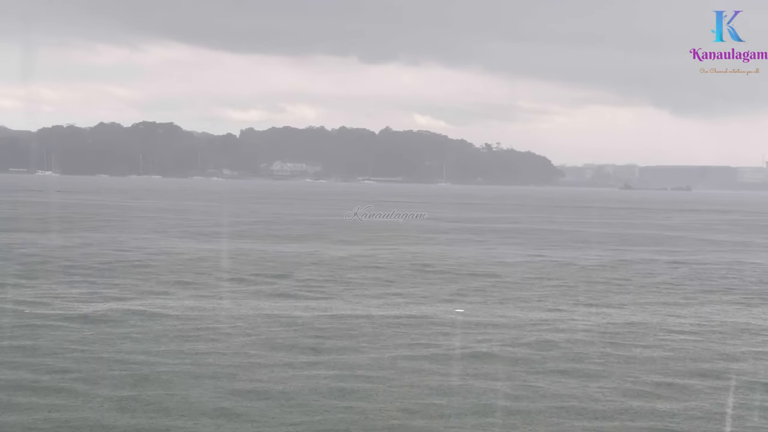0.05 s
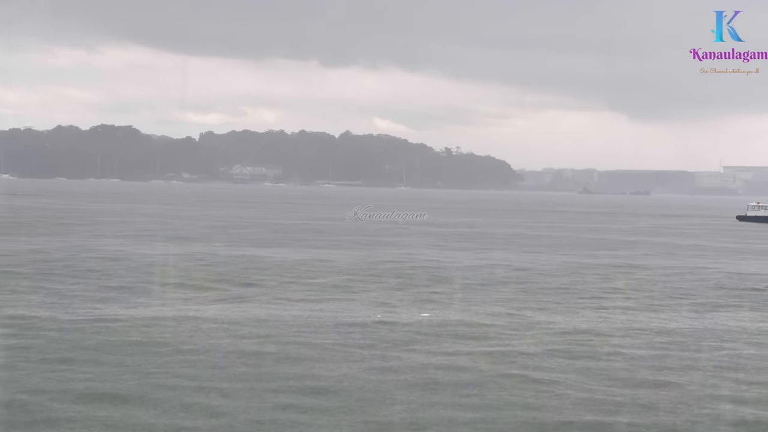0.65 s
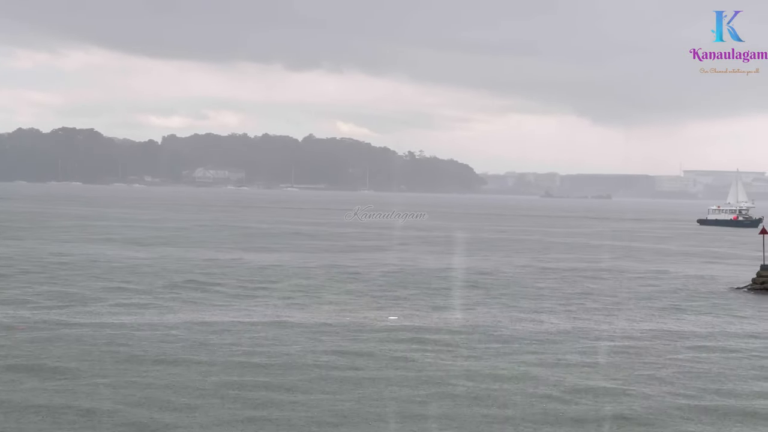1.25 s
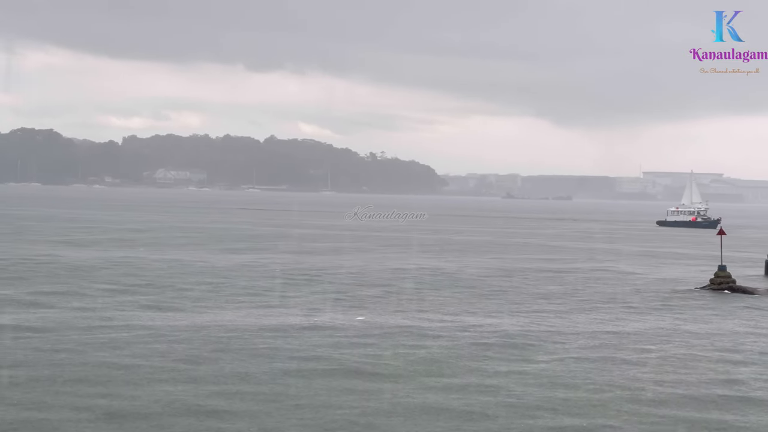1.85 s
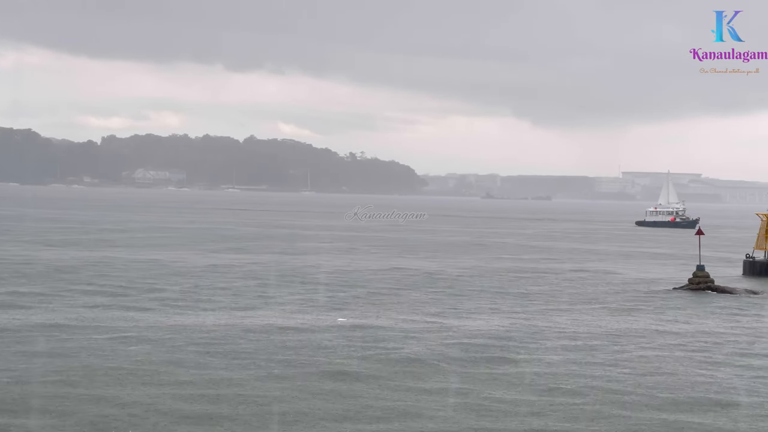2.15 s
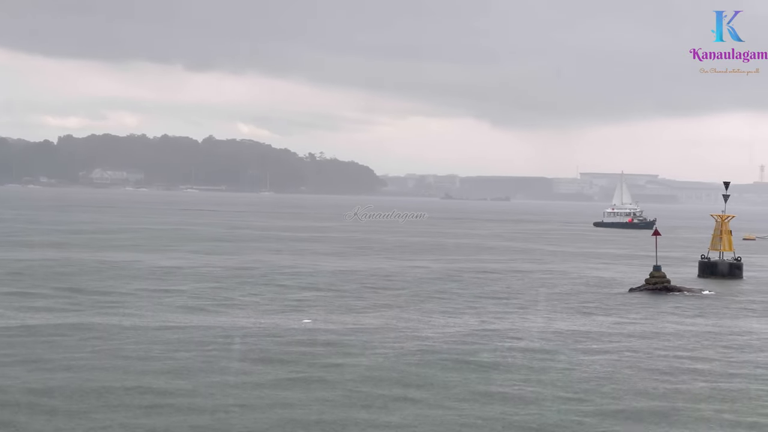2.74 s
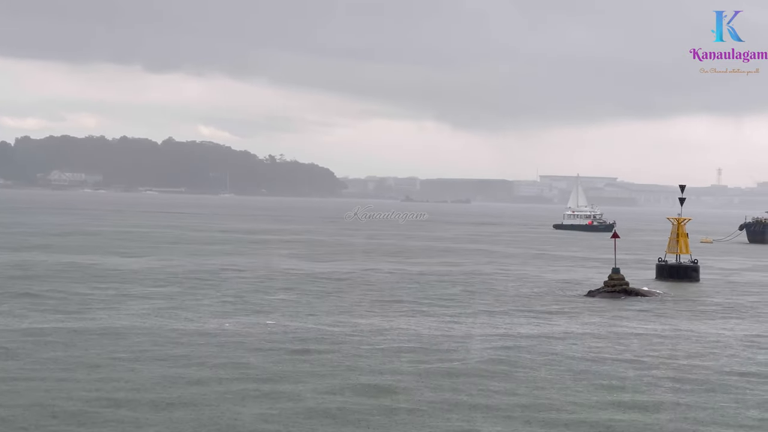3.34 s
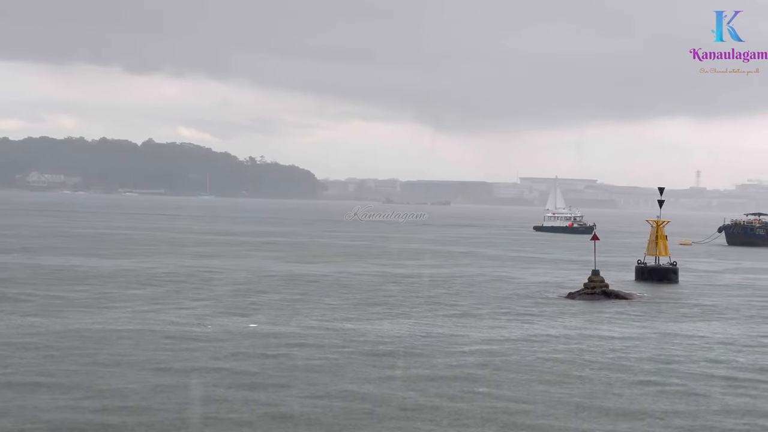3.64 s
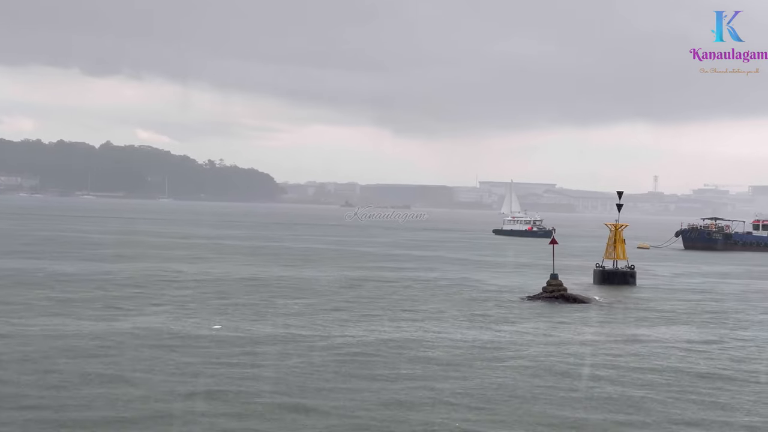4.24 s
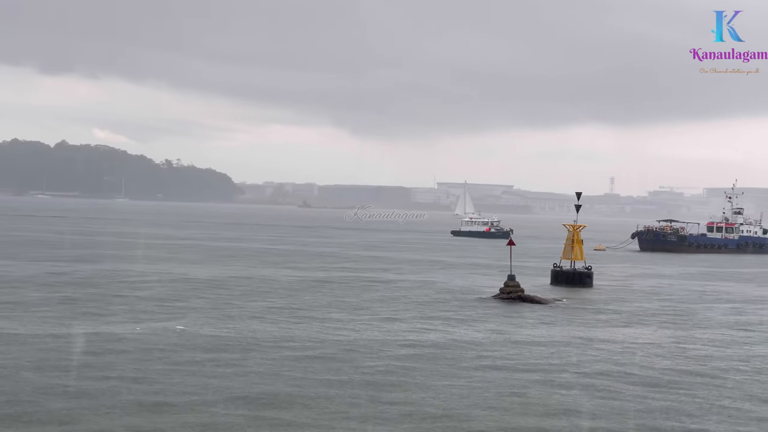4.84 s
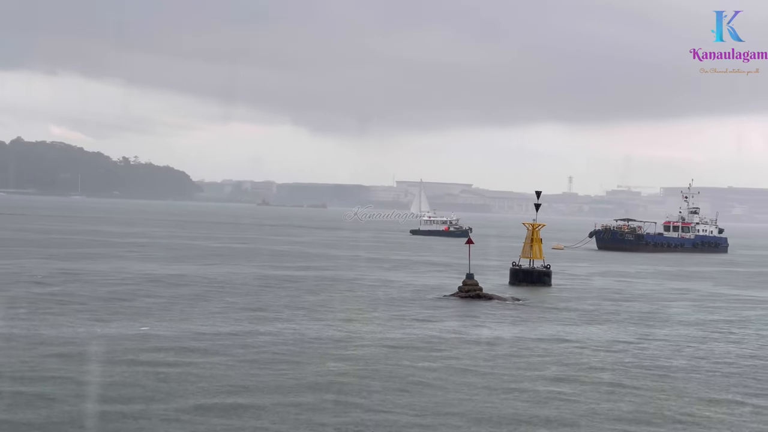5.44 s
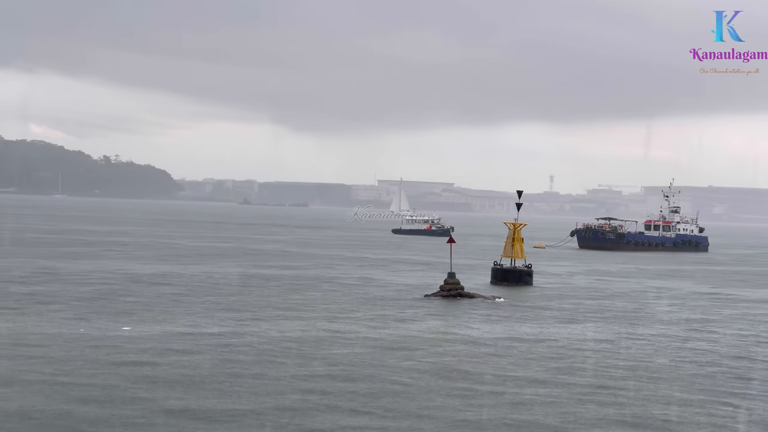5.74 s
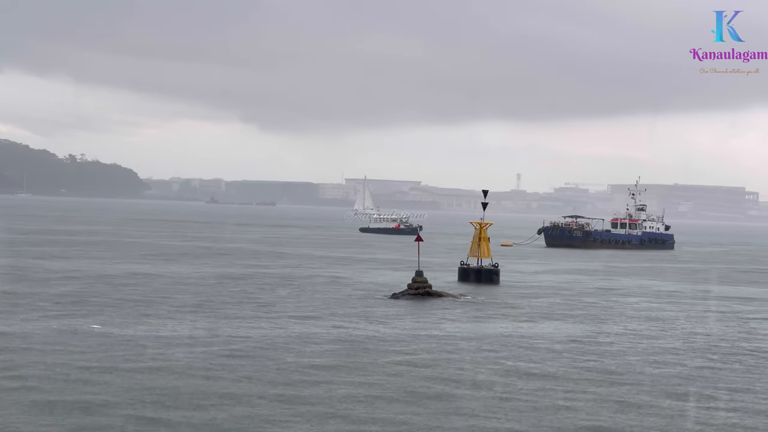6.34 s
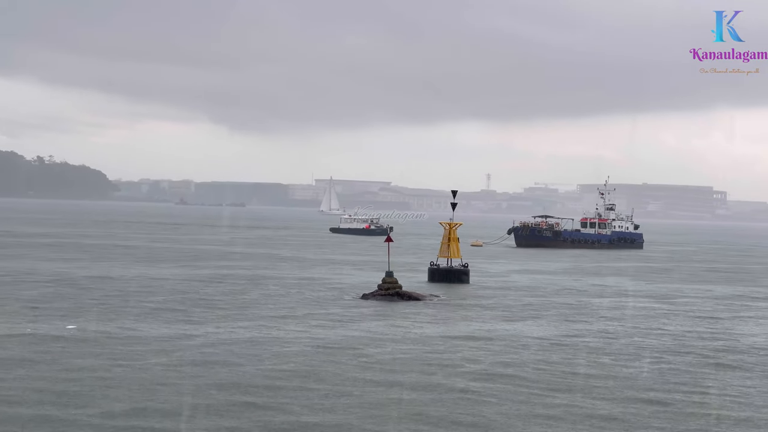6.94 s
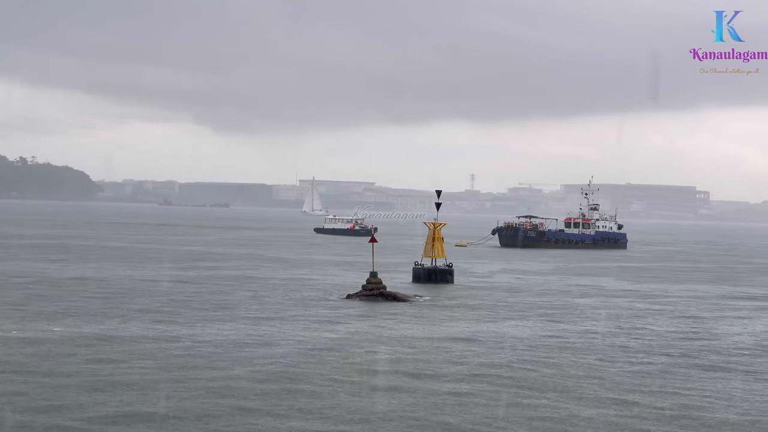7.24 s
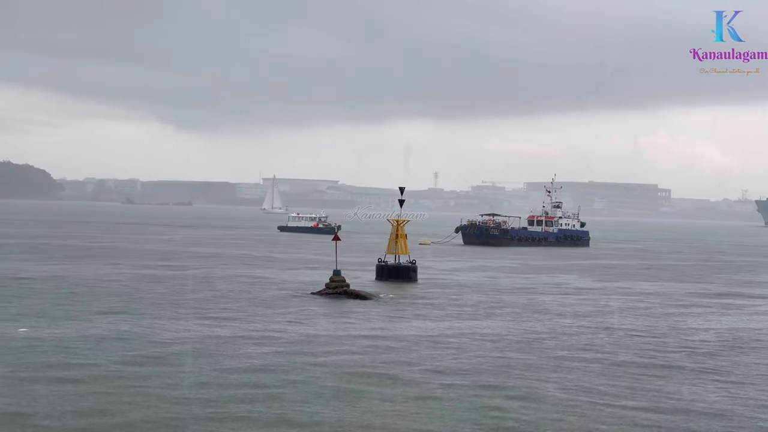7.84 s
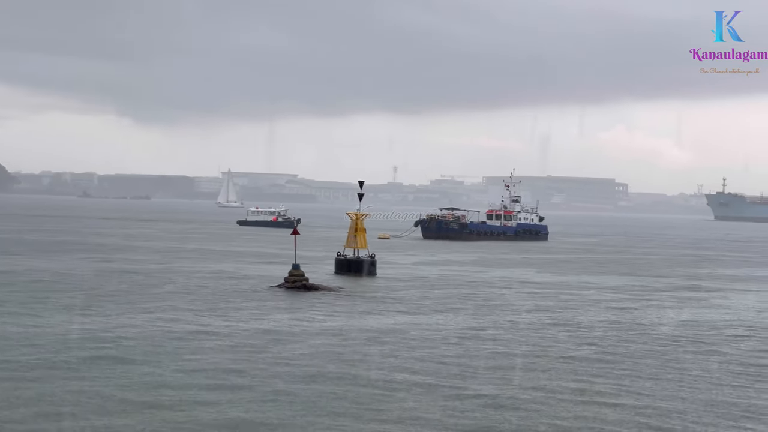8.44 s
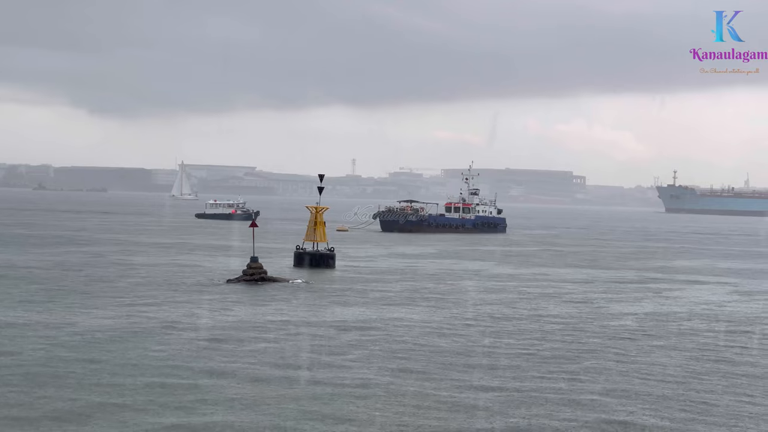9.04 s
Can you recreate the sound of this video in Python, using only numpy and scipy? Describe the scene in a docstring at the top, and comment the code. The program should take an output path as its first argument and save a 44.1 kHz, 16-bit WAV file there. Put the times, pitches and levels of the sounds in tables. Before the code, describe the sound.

Heavy rain hisses steadily on harbour water, with close drops ticking and two boat diesels idling low underneath.

```python
"""Heavy rain on a harbour, heard from a jetty.
From the start, countless far drops merge into a wash and nearer ones patter on water and jetty.
Two boat diesels idle underneath, their exhaust notes beating against each other.
From 0.35 s, single drops splash beside the microphone. The downpour grows slightly to the end."""
import sys
import numpy as np
from scipy import signal
from scipy.fft import rfft, irfft, next_fast_len
from scipy.io import wavfile

SR = 44100
rng = np.random.default_rng(int(sys.argv[2]) if len(sys.argv) > 2 else 0)


def put_to_file(sound):
    """Save the sound as 16-bit audio at rate SR, in the file named by the first command-line argument."""
    columns = np.atleast_2d(sound).T  # one column per channel
    safe = np.clip(columns, -1, 1)
    whole_steps = np.round(safe * 32767)
    wavfile.write(sys.argv[1], SR, whole_steps.astype(np.int16))


N = 404821
TIME_S = np.arange(N) / SR

# rain on open water: (frequency [Hz], relative density [dB])
WASH_SPECTRUM = [(150, -10.5), (340, -1.5), (420, -3), (550, -1.05), (730, -3.5), (900, -2), (1080, -2),
                 (1240, -2.5), (1420, -2), (2100, -7), (3200, -13.5), (5200, -21), (7200, -18.5),
                 (9000, -20), (13000, -26)]
# diffuse stereo field: (frequency [Hz], left-right coherence [0..1], left phase lead [rad])
STEREO_FIELD = [(50, .999, 0.047), (128, 0.95, -0.075), (250, 0.69, -0.16), (420, 0.53, -0.39),
                (627, 0.19, 0), (900, 0.46, 0.59), (1700, 0.29, -0.019), (2630, 0.78, 0.31),
                (3400, 0.9, 0.86), (4900, 0.84, 0.57), (5630, 1, -0.17), (8500, 1, .9),
                (11900, 0.86, -0.91)]
# rise and fall of both engines: (time [s], relative level [dB])
ENGINE_SWELL = [(0, -17), (1.2, -17), (1.9, -21), (2.25, -15.5), (3.3, -21.5), (3.65, -17), (4.3, -19),
                (5.0, -18.5), (5.3, -16), (5.8, -19.5), (6.35, -17.5), (7.0, -16), (7.3, -20.5),
                (7.6, -16.5), (8.4, -20), (8.7, -15.5), (9.18, -18.0)]
# slow diesel, eight firings a cycle: (order [x cycle rate], relative level [dB])
SLOW_DIESEL_ORDERS = [(8, -30.5), (10, -40), (11, -39), (12, -38), (15, -55), (16, -24), (21, -37),
                      (23, -25.5), (24, -24), (25, -26), (26, -29.5), (28, -41), (32, -33.5), (37, -47.5),
                      (48, -47.5), (53, -46.5), (56, -53), (64, -66)]
# fast diesel: (order [x shaft rate], relative level [dB])
FAST_DIESEL_ORDERS = [(6, -24.5), (9, -28.5), (13, -47.5), (14, -45.5), (15, -46.5), (19, -50), (20, -44.5),
                      (21, -55)]
# turbulent exhaust: (frequency [Hz], relative density [dB])
EXHAUST_SPECTRUM = [(20, -40), (31, -29), (40, -11), (56, 4), (66, -2), (80, -3), (95, -4.5), (120, 1),
                    (145, -5), (160, -7), (210, -17), (280, -14.5), (350, -25), (600, -51)]
# drops beside the microphone: (time [s], relative peak [dB], pitch [Hz])
CLOSE_DROPS = [(.353, -23, 10600), (.391, -22, 10700), (.449, -24, 7500), (.483, -20, 10400),
               (1.04, -14, 10300), (1.130, -29, 4800), (1.238, -18.5, 7400), (1.3277, -33, 3800),
               (1.438, -20, 9000), (1.484, -18.5, 10500), (2.352, -21, 10800), (2.603, -21, 10700),
               (2.737, -29, 4500), (2.7466, -26, 4800), (3.421, -21, 8400), (3.444, -14.5, 8300),
               (3.457, -20, 7000), (3.642, -21, 9000), (3.668, -19.5, 7300), (3.677, -25, 10300),
               (3.977, -21, 11100), (4.102, -23, 8500), (4.224, -25, 5530), (4.527, -27, 4500),
               (5.5454, -12, 11000), (5.968, -18.5, 9400), (6.330, -28, 10700), (6.361, -23, 10400),
               (6.425, -26, 4300), (6.531, -22.5, 6000), (6.844, -19.5, 9600), (7.109, -13.5, 11000),
               (7.572, -18, 10700), (8.193, -14, 10300), (8.415, -30, 7600), (9.0206, -10.5, 11400)]


def from_db(db):
    """Decibels to gain."""
    return 10 ** (np.asarray(db) / 20)


def unit_rms(x):
    """Scale to rms 1."""
    return x / np.sqrt(np.mean(x ** 2) + 1e-20)


def at_hz(table, hz):
    """Each value column of a table, interpolated over log frequency."""
    table_hz, *columns = np.transpose(table)
    return [np.interp(np.log(hz + 1e-9), np.log(table_hz), column) for column in columns]


def drift(rate_hz):
    """Slow random wander, rms 1."""
    hop, settle = 100, 2000
    pole = np.exp(-2 * np.pi * rate_hz * hop / SR)
    noise = rng.standard_normal(N // hop + settle + 2)
    slow = signal.lfilter([1], [1, -2 * pole, pole ** 2], noise)[settle:]
    return np.interp(np.arange(N) / hop, np.arange(len(slow)), unit_rms(slow))


def diffuse_noise(spectrum):
    """Coloured stereo noise, partly coherent between the ears; rms 1."""
    size = next_fast_len(N, real=True)
    hz = np.fft.rfftfreq(size, 1 / SR)
    mid, side = rfft(rng.standard_normal((2, size))) * from_db(at_hz(spectrum, hz))
    coherence, lead_rad = at_hz(STEREO_FIELD, hz)
    ears = np.array([[1], [-1]])
    pair = np.sqrt(1 + coherence) * mid + np.sqrt(1 - coherence) * side * ears
    pair *= np.exp(.5j * lead_rad * ears)
    return unit_rms(irfft(pair, size)[:, :N])


def far_rain(flutter_db, right_db):
    """Drops on open water merge into a wash; its midrange leans right."""
    wash = diffuse_noise(WASH_SPECTRUM) * from_db(flutter_db * drift(rate_hz=12))
    midrange = signal.sosfilt(signal.butter(1, [550, 2600], "band", fs=SR, output="sos"), wash)
    pan = from_db([[-right_db / 2], [right_db / 2]])
    return wash + midrange * (pan - 1)


def ring(clicks, hz, cycles):
    """Resonator: each click rings as a sine, 60 dB down after `cycles`."""
    step_rad = 2 * np.pi * min(hz, .45 * SR) / SR
    pole = np.exp(-np.log(1000) * step_rad / (2 * np.pi * cycles))
    feedback = [1, -2 * pole * np.cos(step_rad), pole ** 2]
    return signal.lfilter([0, np.sin(step_rad)], feedback, clicks + 1e-18)


def patter(drops_per_s, low_hz, high_hz, cycles, spread_db, pitches=16, max_size=5):
    """Drops of random size and timing ring at a set of pitches, each pitch panned at random; rms 1."""
    drops = np.zeros((2, N))
    for hz in np.geomspace(low_hz, high_hz, pitches):
        hits = np.flatnonzero(rng.random(N) < drops_per_s / pitches / SR)
        sizes = np.minimum(rng.standard_exponential(N)[hits], max_size)
        clicks = np.zeros(N)
        clicks[hits] = from_db(spread_db * sizes) * (-1) ** hits
        pan = from_db(rng.normal() * np.array([[1], [-1]]))
        drops += ring(clicks, hz, cycles) * pan
    return unit_rms(drops)


def with_spray(drops, spray_db, decay_s):
    """Each drop throws up droplets that fall back in a short dying shower."""
    step = 1 / (decay_s * SR)
    power = signal.lfilter([step], [1, -np.exp(-step)], np.mean(drops ** 2, axis=0))
    shower = rng.standard_normal(N) * np.sqrt(power)
    treble = signal.butter(2, [6000, 12000], "band", fs=SR, output="sos")
    return drops + from_db(spray_db) * signal.sosfilt(treble, shower)


def diesel(base_hz, orders, hunting, flutter_db, chug_s=0, scatter_rad=np.pi):
    """Exhaust harmonics flutter as the governor hunts; low phase scatter bunches them into chugs."""
    speed_hz = base_hz * (1 + hunting * drift(rate_hz=.57))
    angle_rad = 2 * np.pi * (np.cumsum(speed_hz) / SR - base_hz * chug_s)
    note = np.zeros(N)
    for order, level_db in orders:
        gain = from_db(level_db + flutter_db * drift(rate_hz=1.78))
        note += gain * np.sin(order * angle_rad + scatter_rad * rng.normal())
    return note


def boats(slow_cycle_hz=4.953, fast_shaft_hz=13.745, rumble_db_per_s=.16):
    """Two idling diesels beat over their growing exhaust rumble and swell together, slightly left."""
    swell_db = np.interp(TIME_S, *np.transpose(ENGINE_SWELL))
    swell_db -= swell_db.mean()
    slow = diesel(slow_cycle_hz, SLOW_DIESEL_ORDERS, hunting=.0015, flutter_db=1.5,
                  chug_s=.18, scatter_rad=1.2)
    fast = diesel(fast_shaft_hz, FAST_DIESEL_ORDERS, hunting=.00097, flutter_db=1.1)
    drone = (from_db(1.23) * slow + from_db(2) * fast) * from_db(.97 * swell_db)
    rumble = from_db(-25 + rumble_db_per_s * TIME_S + .24 * swell_db) * diffuse_noise(EXHAUST_SPECTRUM)
    return (drone + rumble) * from_db([[.2], [-.2]])


def splashes(cycles, spray_db, spray_s, low_cut_ratio, size=1024):
    """A close drop lands with a sharp tick, then a few milliseconds of fine spray."""
    drops = np.zeros(N + size)
    age_s = np.arange(size) / SR
    for time_s, peak_db, hz in CLOSE_DROPS:
        impact = from_db(spray_db) * rng.standard_normal(size) * np.exp(-age_s / spray_s)
        impact[0] = 1
        # a small drop radiates little below its pitch
        low_cut = signal.butter(2, low_cut_ratio * hz, "high", fs=SR, output="sos")
        tick = signal.sosfilt(low_cut, ring(impact, hz, cycles))
        start = int(time_s * SR)
        drops[start:start + size] += from_db(peak_db) * tick / np.abs(tick).max()
    return drops[:N]


def scene(rain_db_per_s=.1783):
    """One rising downpour level drives wash and patter; boats and close splashes add on top."""
    downpour = from_db(-36 + rain_db_per_s * TIME_S)
    wash = from_db(2.5) * far_rain(flutter_db=.42, right_db=2.4)
    plops = patter(drops_per_s=700, low_hz=844, high_hz=4660, cycles=7, spread_db=3.5)
    metal = patter(drops_per_s=400, low_hz=1203, high_hz=1311, cycles=93, spread_db=1.5, pitches=3)
    ticks = patter(drops_per_s=260, low_hz=7800, high_hz=12500, cycles=7.6, spread_db=3.5)
    jetty = with_spray(ticks, spray_db=2, decay_s=.005)
    rain = wash + from_db(-13) * plops + from_db(-8.5) * metal + from_db(-14.5) * jetty
    close = from_db(4) * splashes(cycles=4.6, spray_db=-23.5, spray_s=.0022, low_cut_ratio=.82)
    return downpour * rain + boats() + close


def record(dry, port_hz=11150, port_db=7.5, lag_hz=10250, rolloff_hz=12100, cutoff_hz=13600):
    """Microphone ports ring in the high treble, where the left lags a full turn; the top falls away."""
    port_ring = signal.lfilter(*signal.iirpeak(port_hz, Q=13, fs=SR), dry)
    sound = dry + (from_db(port_db) - 1) * port_ring
    left, right = signal.sosfilt(signal.butter(5, rolloff_hz, fs=SR, output="sos"), sound)
    left = left - 2 * signal.lfilter(*signal.iirpeak(lag_hz, Q=4.26, fs=SR), left)   # all-pass
    return signal.sosfilt(signal.cheby2(14, 50, cutoff_hz, fs=SR, output="sos"), [left, right])


dry = scene()
out = record(dry)
put_to_file(out)
```